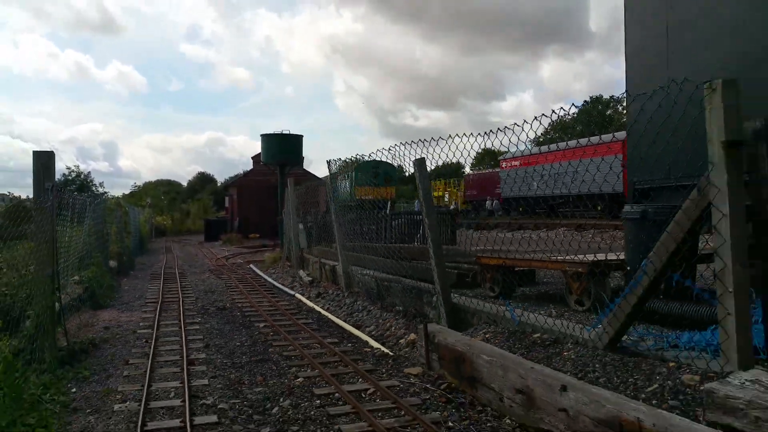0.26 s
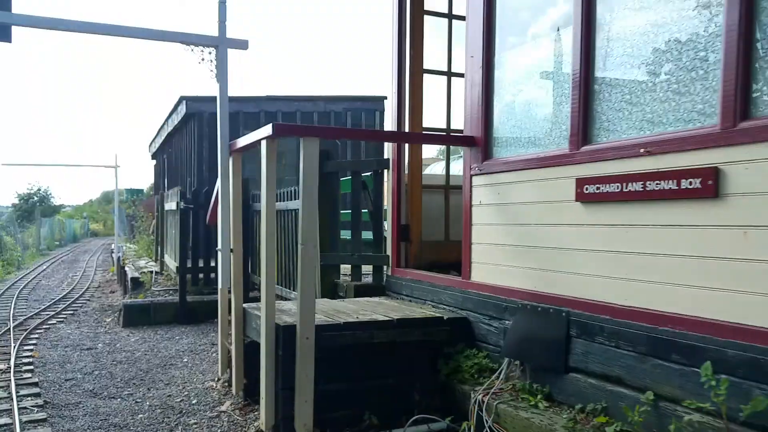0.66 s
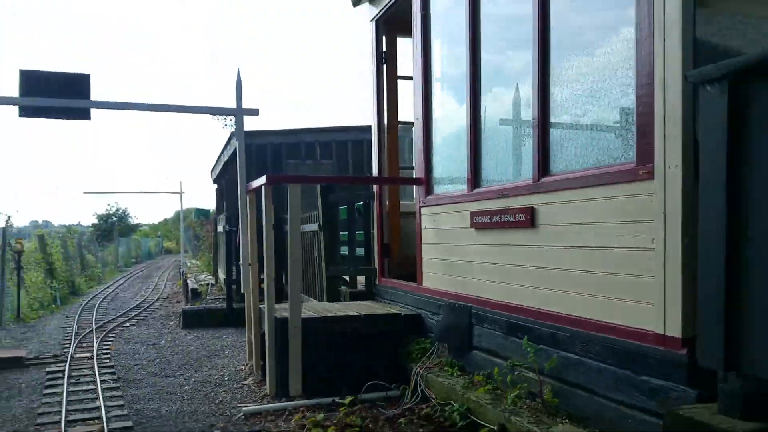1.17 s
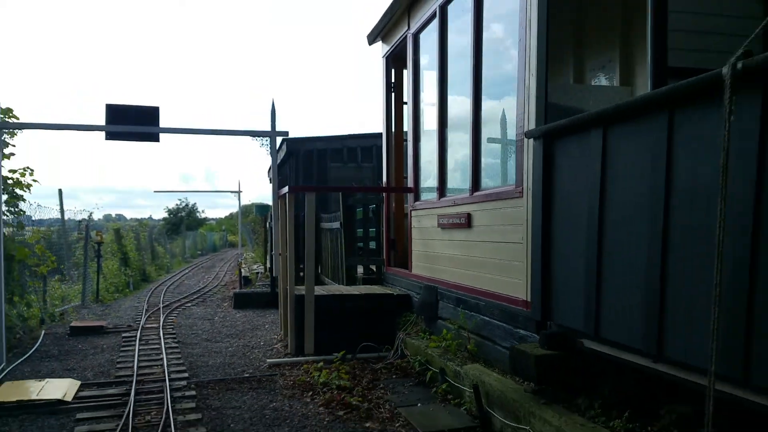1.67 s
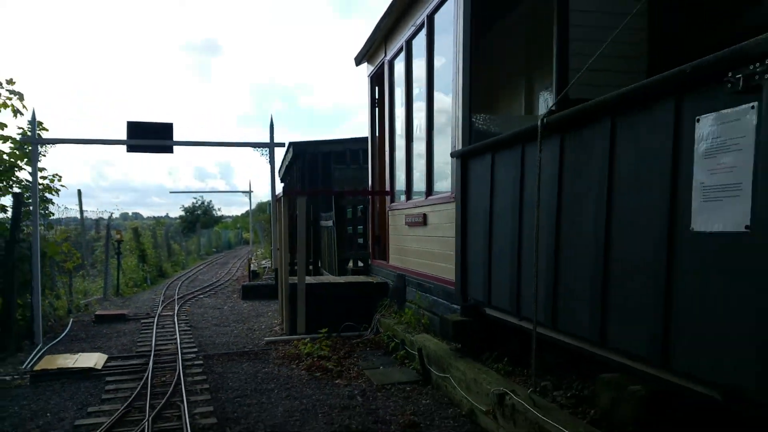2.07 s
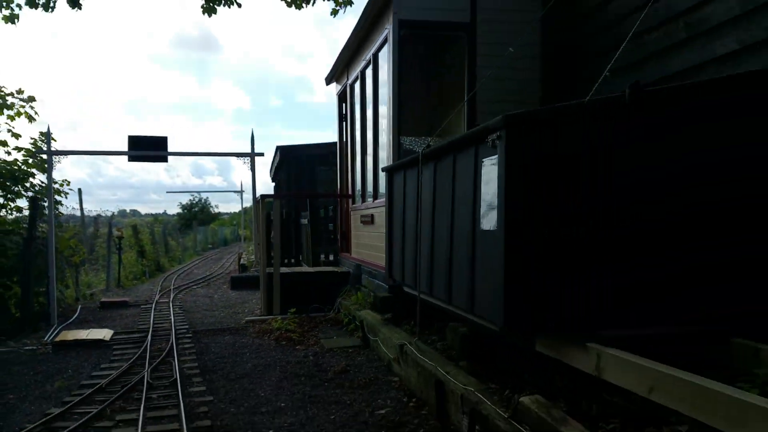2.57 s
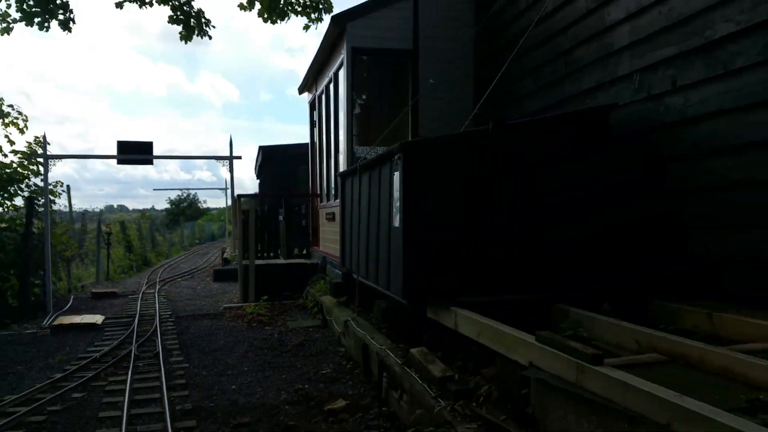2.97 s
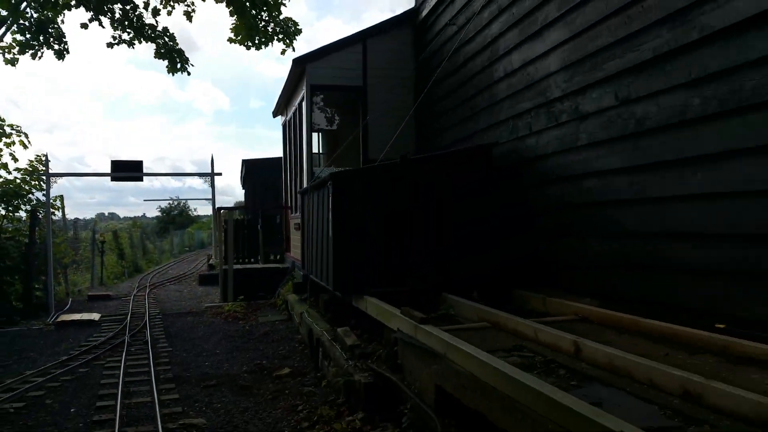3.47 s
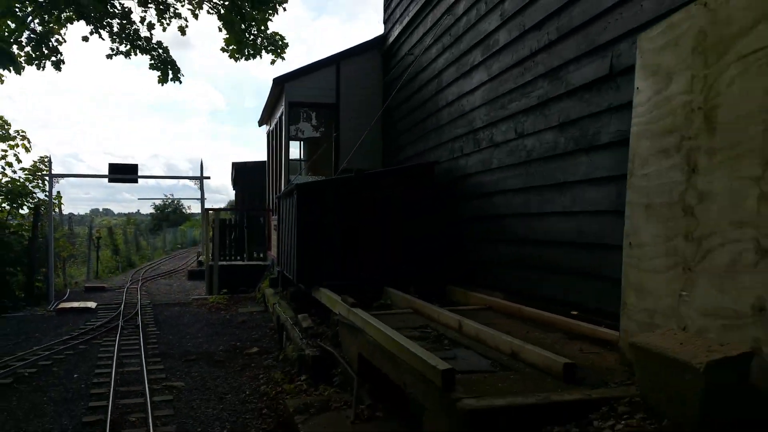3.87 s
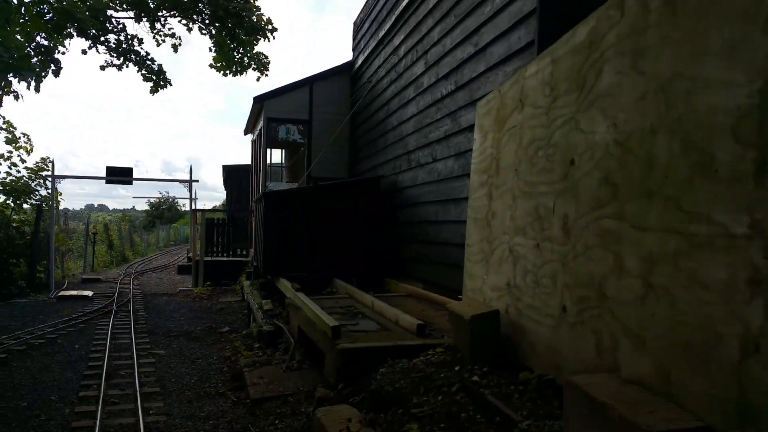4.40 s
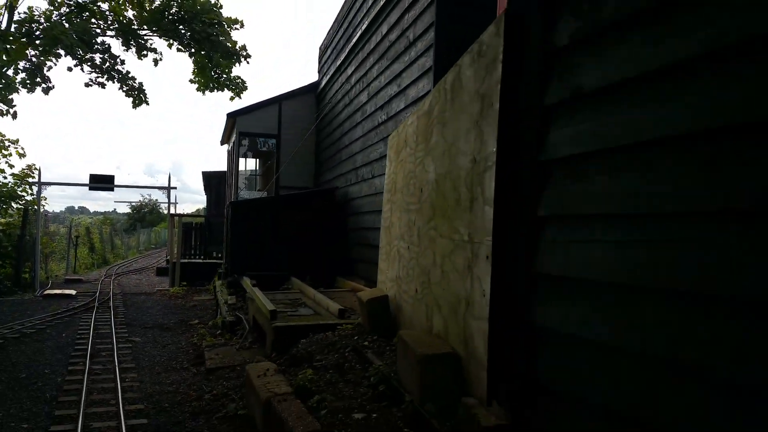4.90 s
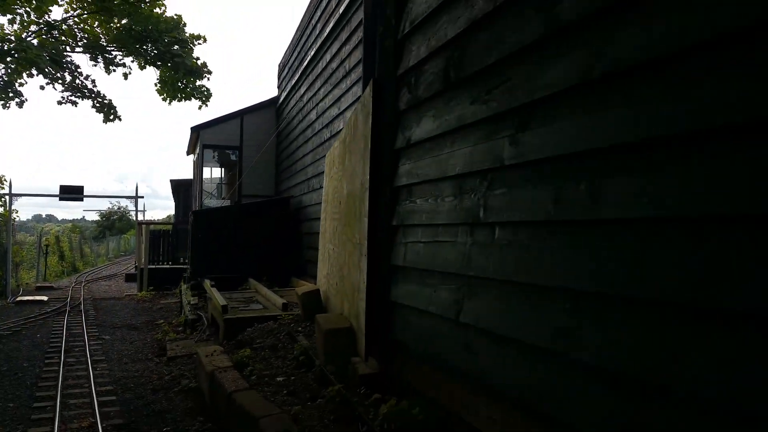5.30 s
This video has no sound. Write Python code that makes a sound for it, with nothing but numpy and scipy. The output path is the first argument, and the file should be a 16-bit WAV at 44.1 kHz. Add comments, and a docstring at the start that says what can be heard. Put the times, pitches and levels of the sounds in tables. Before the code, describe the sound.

Small train heard from on board, droning and rattling along narrow track, an abrupt change at half a second, then clattering loudly across points.

```python
"""A throbbing low drone, a roar and sharp clacks: riding a miniature railway carriage on one stretch of track;
then the scene changes to another stretch, with a set of points. The shaken carriage body drones as close
resonances beat; random forces make steel wheels roar and the frame rattle. Wheels clack over rail joints,
bogies knock and flanges scrape: each blow or rub is a short force or a click that rings through resonances."""
import sys
import numpy as np
from scipy import signal
from scipy.fft import rfft, irfft, next_fast_len
from scipy.io import wavfile
from scipy.ndimage import uniform_filter1d

SR = 44100
rng = np.random.default_rng(int(sys.argv[2]) if len(sys.argv) > 2 else 0)


def put_to_file(sound):
    """Save the sound as 16-bit audio at rate SR, in the file named by the first command-line argument."""
    columns = np.atleast_2d(sound).T  # one column per channel
    safe = np.clip(columns, -1, 1)
    whole_steps = np.round(safe * 32767)
    wavfile.write(sys.argv[1], SR, whole_steps.astype(np.int16))


N = 244710
TIME = np.arange(N) / SR
TAPS = 8192  # length of a response
HZ = np.fft.rfftfreq(TAPS, 1 / SR)
NEW_STRETCH_S = .573

# shaking of the body on the second stretch: (time [s], drone level [dB])
SHAKE = [(.58, -36.5), (.88, -29), (.93, -19.5), (1.1, -19), (1.901, -18), (3.85, -18), (3.98, -28.5),
         (4.8, -24.5), (5.26, -31), (5.32, -20), (5.55, -21.5)]
# chatter of the frame on the second stretch: (time [s], level [dB])
CHATTER = [(.58, -42), (.95, -33.5), (1.45, -32), (2.15, -32.5), (3.05, -31), (3.75, -34.5), (4.1, -34),
           (4.7, -30.5), (5.25, -32), (5.35, -29), (5.55, -32)]
# resonances of the frame and its loose fittings: (frequency [Hz], width [Hz], relative level [dB])
FRAME_MODES = [(263, 125, -0.5), (311, 65, 1), (408, 170, 1), (553, 106, -3), (651.5, 112, 1),
               (780, 160, -9.5), (1020, 150, -15.5)]
# colour of steel struck by steel: (frequency [Hz], relative density [dB per Hz])
CLACK_COLOUR = [(400, 2.5), (900, 10), (1400, 7), (2200, 7.5), (3100, -4.5), (4000, -17.5), (5500, -25),
                (7000, -46), (9000, -46.5)]
# wheel strikes at rail joints, and the further bounces and clatter after some of them, levels before trims: #
# (time [s], clack level [dB], crack level [dB], thud level [dB], # strike t60 [s], first contact [dB re
# strike], rebound delay [s], rebound [dB re strike], # wheel ring [Hz], ring level [dB])
CLACKS = [(.453, -24, -34, -22, .051, 6, .019, -2, 1140, -29),
          (.621, -23.5, -25, -23, 0.05, -10, 0.0045, -9, 4060, -29),
          (0.8004, -24, -24.5, -24.5, 0.042, 4.5, 0.0012, 1.5, 4000, -19.5),
          (1.335, -36, -41, -49, 0.052, -3, .0027, -4, 1100, -24.5),
          (1.535, -25, -40, -14.5, 0.021, -4, 0.003, -10, 2070, -19),
          (1.706, -34, -29, -26.5, 0.069, -2, .0072, -3, 2230, -23),
          (2.2042, -20.5, -24, -18, 0.027, 0, .009, -9, 2190, -18),
          (2.3826, -21, -27.5, -19.5, 0.031, 2, 0.0035, 3.5, 2200, -16.5),
          (2.4, -29, -33, -39, .04, 2, 0.0052, 2, 1800, -21),
          (2.41, -32, -29.5, -47, 0.14, 1, 0.01, -3, 4550, -39),
          (2.43, -30, -29.5, -44, 0.023, 4, 0.0046, -5, 2100, -27),
          (2.905, -33, -34, -47, 0.083, 1, 0.013, 6, 2090, -26),
          (3.344, -28.5, -31, -21.5, 0.035, -4, .018, -4, 1290, -36),
          (3.5256, -28, -30.5, -21, 0.016, 3, 0.003, -7, 2160, -30),
          (4.057, -21.5, -23.5, -23, 0.041, 3, .0068, 6, 5100, -30),
          (4.09, -28, -40, -48, 0.056, 0, 0.0054, -3, 2390, -27),
          (4.2525, -19.5, -25, -20.5, 0.055, 4, 0.0072, 1.5, 2480, -20),
          (5.498, -28.5, -58, -26.5, 0.054, -2, .0039, -2, 2020, -33)]
# likeness of the two microphones: (frequency [Hz], likeness [0-1])
LIKENESS = [(30, 0), (80, .25), (120, .7), (160, .98), (210, .94), (280, .68), (650, .7), (1100, .38),
            (1650, .15), (2300, .48), (3000, .2), (4000, .22), (8000, 0)]
# balance of the two microphones: (frequency [Hz], left minus right [dB])
SIDES = [(40, -4), (70, -3), (110, -4), (160, -0.5), (400, -2), (650, 0), (850, -1), (1150, -0.5),
         (2100, -6), (3800, -6), (5000, -2.5), (6100, -8), (7600, 3), (11000, 1)]
# phase by which the left microphone leads: (frequency [Hz], lead [rad])
LEAD = [(190, -.05), (500, -.55), (800, -.65), (1100, -1.4), (1320, -.5), (1600, -2.6), (1750, -4.5),
        (2550, -5.1), (3100, -3.6), (3600, -3.2), (4000, -2.1), (6000, -.5)]


def gain_of(db):
    """Decibels to amplitude."""
    return 10 ** (np.asarray(db) / 20)


def read(points, hz):
    """A spectrum table, joined on a log-frequency axis."""
    f, value = np.transpose(points)
    return np.interp(np.log(hz + 1), np.log(f + 1), value)


def ride(first_db, curve):
    """Level in dB: steady on the first stretch of track, then following a curve on the second."""
    return np.where(TIME < NEW_STRETCH_S, first_db, np.interp(TIME, *np.transpose(curve)))


def add(mix, s, sound):
    """Mixes a stereo sound in at time s."""
    part = mix[:, max(round(s * SR), 0):][:, :sound.shape[1]]
    part += sound[:, :part.shape[1]]


def drift(low_hz, high_hz):
    """Random wandering of rms 1, with no rates below low_hz and fading above high_hz."""
    hz = np.fft.rfftfreq(N, 1 / SR)
    x = irfft(rfft(rng.standard_normal(N)) * (hz > low_hz) / (1 + (hz / high_hz) ** 2), N)
    return x / x.std()


def evened(x):
    """Scales a stereo pair so that its middle has rms 1."""
    return x / np.sqrt(np.mean(x.mean(0) ** 2) + 1e-20)


def steadied(x, span_s):
    """Takes out slow swells and keeps the fast flutter."""
    window = signal.windows.hann(max(int(span_s * SR), 3))
    power = signal.fftconvolve(evened(x).mean(0) ** 2, window / window.sum(), "same")
    return evened(x / np.sqrt(abs(power) + .01))


def modes(table):
    """Response in dB of a few resonances, each 6 dB down at the edges of its width."""
    power = 0
    for hz, width_hz, db in table:
        offset = (HZ - hz) / width_hz * 2
        power = power + gain_of(db) ** 2 / (1 + offset ** 2) ** 2
    return 10 * np.log10(power)


def dense_modes(colour, ripple_db):
    """Response in dB of many overlapping modes: a broad colour with random peaks and dips above the bass."""
    ripple = uniform_filter1d(uniform_filter1d(rng.standard_normal(len(HZ)), size=7), size=7)
    above_bass = np.clip(HZ / 900, 0, 1) ** 2
    return read(colour, HZ) + ripple_db * ripple / ripple.std() * above_bass


def vibration(response_db, force, clicks=0):
    """A random force, with any hard clicks, rings through a response; likeness at two microphones varies with pitch."""
    size = next_fast_len(len(force), real=True)
    hz = np.fft.rfftfreq(size, 1 / SR)
    left, other = rfft(rng.standard_normal((2, size)))
    same = np.clip(read(LIKENESS, hz), 0, 1)
    right = same * left * np.exp(-1j * read(LEAD, hz)) + np.sqrt(1 - same ** 2) * other
    drive = irfft([left, right], size)[:, :len(force)] * force + clicks

    sides_db = read(SIDES, HZ) * np.array([[.5], [-.5]])
    gain = gain_of(response_db - response_db.max() + sides_db) + 1e-5
    # minimum phase: the ringing follows the push
    cepstrum = irfft(np.log(gain))[:, :TAPS // 2]
    cepstrum[:, 1:] *= 2
    ring = irfft(np.exp(rfft(cepstrum, TAPS)))
    ring /= np.sqrt(np.sum(ring ** 2) / 2)
    return signal.fftconvolve(drive, ring, axes=1)[:, :len(force)]


def ping(hz, db, rise_s):
    """One struck resonance swells to its peak in rise_s and dies away, out of step at the two microphones."""
    t = TIME[:SR // 5]
    lag_rad = read(LEAD, hz) + (1 - read(LIKENESS, hz)) * rng.uniform(-2.5, 3.8)
    sides = gain_of(db + read(SIDES, hz) * np.array([[.5], [-.5]]))
    swell = t / rise_s * np.exp(1 - t / rise_s)
    return sides * swell * np.sin(2 * np.pi * hz * t - np.array([[0], [lag_rad]]))


def patchy(x, depth_db, size):
    """Resonances swell and fade in turn as the contact wanders; size = (bins, frames) of the smoothing."""
    z = signal.stft(x, nperseg=512, noverlap=384)[2]
    field = rng.standard_normal(z.shape[1:])
    for axis in (0, 1, 0, 1):
        field = uniform_filter1d(field, size[axis], axis)
    swell = gain_of(depth_db * field / field.std())
    swell /= np.sqrt(np.mean(swell ** 2))
    return signal.istft(z * swell, nperseg=512, noverlap=384)[1][:, :N]


def jolts(per_s, spread_db, t60):
    """Envelope of many small random blows, each dying quickly; rms 1."""
    struck = rng.random(N) < per_s / SR
    hits = struck * gain_of(spread_db * np.minimum(rng.exponential(1, N), 3))
    energy = signal.lfilter([1], [1, -np.exp(-2 * np.log(1000) / (t60 * SR))], hits ** 2)
    return np.sqrt(energy / energy.mean())


def blow(t60, rebound_s=0., rebound_db=-66.0, tail_db=-18., tail_t60=.28, rattle=1):
    """Force of a strike, of its rebound and of the weaker clatter after them."""
    t = TIME[:SR // 3]
    strike = gain_of(-60 * t / t60)
    rebound = gain_of(rebound_db - 60 * abs(t - rebound_s) / t60) * (t > rebound_s)
    tail = rattle * gain_of(tail_db - 60 * t / tail_t60)
    return np.sqrt(strike ** 2 + rebound ** 2 + tail ** 2)


def contact(rebound_s=0., rebound_db=-64.0):
    """A hard contact and its rebound: clicks of every frequency, smeared on their way to each microphone."""
    steady_s = 0.0011  # a click is as strong as this much steady force
    scatter_s = 0.002975  # largest delay of a frequency
    paths = uniform_filter1d(rng.standard_normal((2, 2, len(HZ))), size=90)
    delay_s = scatter_s * np.clip(.5 + paths / paths.std() / 4, 0, 1)
    turn = 2 * np.pi * np.cumsum(delay_s, -1) * HZ[1]
    first, second = np.exp(-1j * (turn + read(LEAD, HZ) * np.array([[0], [1]])))
    rebound = gain_of(rebound_db) * second * np.exp(-2j * np.pi * HZ * rebound_s)
    clicks = irfft(first + rebound)[:, :TAPS // 4]
    return np.sqrt(steady_s * SR) * np.pad(clicks, ((0, 0), (0, SR // 3 - TAPS // 4)))


def hiss(first_db=-63, usual_db=-57, usual_shake_db=-10, follows=0.18):
    """Faint high hiss; on the second stretch it gains `follows` dB for each dB of shaking."""
    # (frequency [Hz], relative density [dB per Hz])
    fizz_colour = [(3000, -8.5), (6500, 2.5), (7600, 0.5), (8200, 1), (10000, 0), (12500, -4), (15200, -9)]
    curve = [(s, usual_db + follows * (db - usual_shake_db)) for s, db in SHAKE]
    return vibration(read(fizz_colour, HZ), gain_of(ride(first_db, curve)))


def hum(hz=57.6, level_db=-43):
    """Low engine note of wavering pitch, a sine heard on the first stretch."""
    turns = np.cumsum(hz * (1 + 0.017 * drift(1, 6))) / SR
    fade = np.clip((NEW_STRETCH_S - TIME) / .01, 0, 1)
    return gain_of(level_db) * np.sqrt(2) * np.sin(2 * np.pi * turns) * fade


def rumble(first_db=-47, trim_db=6.5):
    """The carriage lurches on uneven track: coloured low noise follows the swaying."""
    # swaying on the second stretch: (time [s], level before trim [dB])
    lurch = [(.58, -55), (1.1, -49.5), (1.5, -52), (1.72, -42.5), (1.95, -46), (2.42, -40), (2.62, -36),
             (2.83, -33), (3.35, -38.5), (3.6, -38.5), (3.9, -35), (4.45, -59), (5.1, -63), (5.35, -48)]
    # (frequency [Hz], relative density [dB per Hz])
    rumble_colour = [(10, -27), (25, -17.5), (45, -6), (60, 4.5), (80, 0.5), (105, 8), (135, -1),
                     (190, -13), (250, -8), (320, -3.5), (420, -4), (700, -31.5), (2500, -100.5)]
    sway = steadied(vibration(read(rumble_colour, HZ), np.ones(N)), span_s=.2)
    return sway * uniform_filter1d(gain_of(ride(first_db, lurch) + trim_db), size=400)


def drone(first_db=-22, span_s=0.23, throb_db=1.4, fade_in_s=0.029, kick_rise_s=0.017):
    """Close body modes, shaken at random, beat against each other and boom after each wheel strike."""
    # carriage body: (frequency [Hz], width [Hz], relative level [dB])
    body_modes = [(142, 19, -5.5), (159.8, 9.7, -0.5), (171.6, 37, -5), (199.9, 23.5, -7), (227, 19, -14.5),
                  (286.2, 76, -20)]
    body = vibration(modes(body_modes), np.ones(N + TAPS))[:, TAPS:]
    power = gain_of(ride(first_db, SHAKE) + throb_db * drift(3.0, 3.8)) ** 2
    for s, _, _, thud_db, *_ in CLACKS:
        age = np.maximum(TIME - s, 0) / kick_rise_s
        power += (gain_of(thud_db) * age * np.exp(1 - age)) ** 2
    level = uniform_filter1d(np.sqrt(power), size=250)
    return steadied(body, span_s) * level * np.minimum(TIME / fade_in_s, 1)


def frame(first_db=-34, steady_db=-1.0, rattle_db=-6.5):
    """Couplings and frame chatter in random jolts over an uneven low roar."""
    chatter = gain_of(rattle_db) * jolts(per_s=52, spread_db=4.0, t60=0.019)
    force = np.hypot(gain_of(steady_db), chatter) * gain_of(ride(first_db, CHATTER))
    return patchy(vibration(modes(FRAME_MODES), force), depth_db=1.9, size=(2, 14))


def judder(trim_db=6.5, spread_db=1.0, rise_s=0.0017, count=150):
    """Loose fittings knock at random near frame resonances, harder where the frame chatters."""
    out = np.zeros((2, N))
    for when, part, detune, strength in rng.random((count, 4)):
        s = NEW_STRETCH_S + when * (TIME[-1] - NEW_STRETCH_S)
        hz, width_hz, mode_db = FRAME_MODES[int(part * len(FRAME_MODES))]
        chatter_db = np.interp(s, *np.transpose(CHATTER))
        db = mode_db + chatter_db + trim_db + spread_db * (.5 - strength)
        add(out, s, ping(hz + width_hz * (detune - .5), db, rise_s))
    return out


def wheels(first_db=-36, steady_db=1.5, grit_db=-3.0, sing_db=-37.0):
    """Rough rail under steel wheels: a shifting, gritty roar, with singing modes on the first stretch."""
    # roughness of the rail on the second stretch: (time [s], level before steady and grit gains [dB])
    rolling = [(.58, -40.5), (.95, -34), (1.6, -33.5), (2.35, -35), (2.7, -37), (4.5, -35.5), (5.55, -36.5)]
    # (frequency [Hz], relative density [dB per Hz])
    wheel_colour = [(300, -5), (700, -0.5), (1100, 3), (1350, 1), (1650, -3.5), (2100, -1), (2500, -3),
                    (3000, -6), (3900, -8), (4400, -13), (5000, -13.5), (6000, -25), (7200, -38.5),
                    (10000, -78)]
    # singing wheels and rails: (frequency [Hz], width [Hz], relative level [dB])
    singing_modes = [(643, 130, 8), (1040, 140, 1), (1866, 230, 6), (2040, 90, 0), (2420, 350, 0.5),
                     (3420, 29, 0), (3830, 160, 1)]
    grit = gain_of(grit_db) * jolts(per_s=90, spread_db=2.5, t60=.035)
    surge_db = .6 * drift(2, 9)
    force = np.hypot(gain_of(steady_db), grit) * gain_of(ride(first_db, rolling) + surge_db)
    sing_force = gain_of(sing_db + surge_db) * (TIME < NEW_STRETCH_S)
    singing = vibration(modes(singing_modes), sing_force)
    roar = vibration(dense_modes(wheel_colour, ripple_db=1.4), force)
    return patchy(roar, depth_db=1.3, size=(3, 11)) + patchy(singing, depth_db=3.5, size=(3, 14))


def grazes(level_db=-37.5, spread_db=2.5, mean_length_s=0.024, low_hz=560, high_hz=2600, width_hz=220,
           tilt_db_per_octave=-0.5, count=36):
    """Flanges brush lightly at random moments, each waking a different wheel resonance, higher ones weaker."""
    out = np.zeros((2, N))
    for when, pitch, length, strength in rng.random((count, 4)):
        s = NEW_STRETCH_S + when * (TIME[-1] - NEW_STRETCH_S)
        hz = low_hz * (high_hz / low_hz) ** pitch
        length_s = mean_length_s * (.5 + length)
        rub = np.sin(np.pi * np.minimum(TIME[:SR // 6] / length_s, 1))
        db = level_db + spread_db * (2 * strength - 1) + tilt_db_per_octave * np.log2(hz / low_hz)
        add(out, s, vibration(modes([(hz, width_hz, 0)]), gain_of(db) * rub))
    return out


def scrapes(rasp_trim_db=-1.0, squeak_trim_db=-1.0, squeak_rise=.25):
    """A flange rubs the rail for a moment and makes one wheel resonance rasp and squeak."""
    # (time [s], length [s], frequency [Hz], level before trims [dB])
    flange_rubs = [(0.836, 0.019, 2470, -34.5), (0.94, 0.032, 1220, -32.5), (1.28, 0.026, 1390, -38),
                   (1.329, 0.018, 2490, -27.5), (1.425, 0.031, 1430, -32), (1.706, 0.014, 2160, -26),
                   (2.16, 0.018, 1300, -36), (3.212, 0.054, 2200, -43), (3.405, 0.053, 1335, -36),
                   (4.63, 0.024, 2900, -36), (4.816, 0.017, 2070, -36), (5.222, .035, 1250, -49)]
    out = np.zeros((2, N))
    for s, length_s, hz, db in flange_rubs:
        rub = np.sin(np.pi * np.minimum(TIME[:SR // 8] / length_s, 1))
        rise_s = squeak_rise * length_s
        add(out, s, vibration(modes([(hz, 320, 0)]), gain_of(db + rasp_trim_db) * rub))
        add(out, s + rise_s, ping(hz, db + squeak_trim_db, rise_s))
    return out


def bumps(rise_s=0.014):
    """The carriage drops into the gaps of points and joints and its floor booms."""
    # (time [s], boom [Hz], level [dB])
    floor_drops = [(2.356, 84, -20.5), (2.429, 70, -22.5), (2.716, 169, -13.5), (2.807, 84, -16),
                   (2.975, 94, -21), (3.461, 90, -29), (3.585, 85, -24), (3.665, 90, -26), (3.863, 81, -26),
                   (4.062, 166, -19.5), (4.257, 181.4, -15.5)]
    out = np.zeros((2, N))
    for s, hz, db in floor_drops:
        add(out, s, ping(hz, db, rise_s))
    return out


def knocks(note_db=1.0, bump_db=-5.5, shudder_db=-9.5, clack_db=-16.0, rise_s=0.0011):
    """Bogies bump against the frame: a hard contact, a short hollow note, a shudder with a little steel in it."""
    # (time [s], level before part gains [dB], shudder t60 [s], note [Hz])
    bogie_knocks = [(0.804, -14, 0.063, 620), (1.132, -28, 0.033, 300), (1.531, -18, .03, 310),
                    (1.707, -18, 0.045, 433), (1.993, -22, 0.029, 290), (2.353, -21, .05, 400),
                    (2.392, -16.5, 0.022, 340), (2.508, -19, .018, 563), (2.613, -24, 0.02, 640),
                    (2.7032, -14, .012, 520), (2.7113, -10, .022, 397), (2.7107, -20.5, .015, 970),
                    (2.791, -16.5, 0.1, 427), (2.887, -24, .068, 420), (3.054, -15, 0.013, 400),
                    (3.115, -16, 0.02, 310), (3.226, -20, .045, 410), (3.347, -16.5, .06, 396),
                    (3.531, -21, .06, 310), (3.84, -22, 0.33, 338), (3.931, -19, 0.025, 350),
                    (4.233, -25, .02, 565), (4.495, -20, 0.46, 500), (4.633, -18, 0.17, 565),
                    (4.868, -22, .06, 665), (5.16, -30, .04, 300), (5.296, -34, .1, 326),
                    (5.329, -22, 0.046, 300), (5.413, -21, .05, 302)]
    # bump against the frame: (frequency [Hz], relative density [dB per Hz])
    hollow_colour = [(120, -20.5), (300, -0.5), (650, -1), (1000, -12), (1400, -19.5), (2500, -45),
                     (8000, -80)]
    out = np.zeros((2, N))
    for s, db, t60, hz in bogie_knocks:
        force = gain_of(db + shudder_db) * blow(t60, tail_db=-20., tail_t60=.25)
        hit = gain_of(db + bump_db) * contact()
        add(out, s, ping(hz, db + note_db, rise_s))
        add(out, s, vibration(read(hollow_colour, HZ), force, hit))
        add(out, s, vibration(read(CLACK_COLOUR, HZ), gain_of(clack_db) * force))
    return out


def joints(clack_trim_db=0.6, crack_trim_db=-2.5, clatter_db=-1.5, rebound_trim_db=-4.,
           thud_length=2.9, thud_rise_s=0.0015, thud_lag_s=0.00233, ring_rise=0.03):
    """A wheel strikes a rail end, or lands again after bouncing: it rings, steel cracks and clatters, the frame
    thuds."""
    # (frequency [Hz], relative density [dB per Hz])
    crack_colour = [(1500, -19.5), (3000, 9.5), (4000, 4), (5300, -1.5), (6500, -12.5), (8000, -19.5),
                    (11000, -21.5), (15000, -42)]
    # (frequency [Hz], relative density [dB per Hz])
    thud_colour = [(60, -28), (150, 3), (300, 1), (430, 9.5), (650, 5.5), (900, -6.5), (1500, -31.5),
                   (4000, -46.5), (8000, -92)]
    out = np.zeros((2, N))
    loose = jolts(per_s=220, spread_db=2.5, t60=.012)
    for s, clack, crack, thud, t60, first_db, rebound_s, rebound_db, ring_hz, ring_db in CLACKS:
        rattle = np.roll(loose, -round(s * SR))[:SR // 3]
        force_rebound_db = rebound_db + rebound_trim_db
        steel = gain_of(clatter_db) * blow(t60, rebound_s, force_rebound_db,
                                           tail_db=-7.0, tail_t60=0.32, rattle=rattle)
        strike = gain_of(first_db) * contact(rebound_s, rebound_db - first_db)
        heavy = blow(t60 * thud_length, rebound_s, force_rebound_db, tail_db=-13., tail_t60=.25)
        heavy *= 1 - np.exp(-TIME[:len(heavy)] / thud_rise_s)

        clack_sound = vibration(dense_modes(CLACK_COLOUR, ripple_db=2.5), steel, strike)
        # the crack takes the clicks with sides swapped
        crack_sound = vibration(dense_modes(crack_colour, ripple_db=2.5), steel, strike[::-1])
        thud_sound = vibration(dense_modes(thud_colour, ripple_db=2.5), gain_of(thud) * heavy)
        add(out, s, gain_of(clack + clack_trim_db) * clack_sound)
        add(out, s, gain_of(crack + crack_trim_db) * crack_sound)
        add(out, s, ping(ring_hz, ring_db, ring_rise * t60))
        add(out, s + thud_lag_s, thud_sound)
    return out


def scene():
    """Everything heard from the seat."""
    running = drone() + hum() + rumble() + frame() + judder() + wheels() + hiss()
    blows = joints() + knocks() + bumps()
    return running + blows + scrapes() + grazes()


def record(dry, edge_hz=15400):
    """Band limit: a linear-phase low-pass."""
    lowpass = signal.firwin(511, edge_hz, window=("kaiser", 9), fs=SR)
    return signal.oaconvolve(dry, lowpass[None], "same")


dry = scene()
out = record(dry)
put_to_file(out)
```